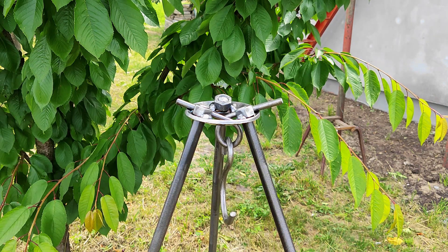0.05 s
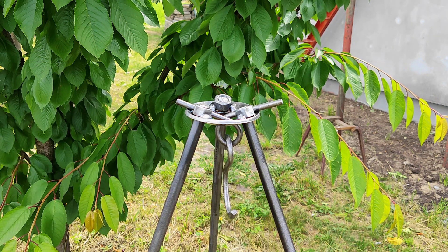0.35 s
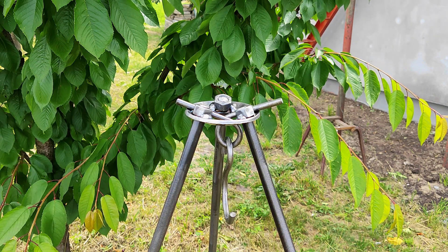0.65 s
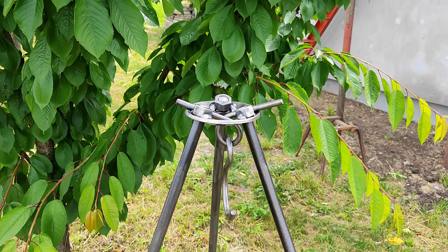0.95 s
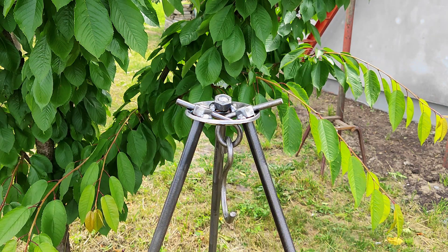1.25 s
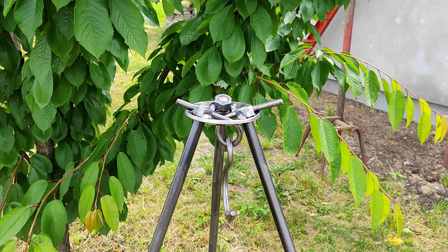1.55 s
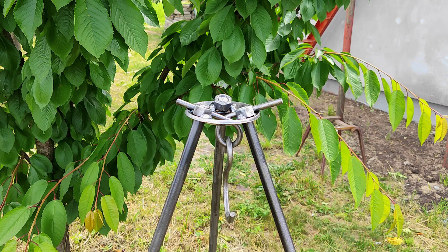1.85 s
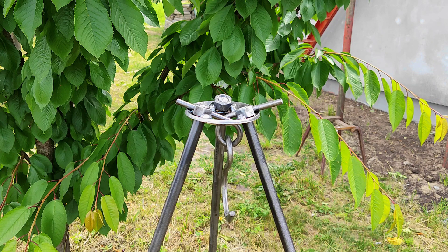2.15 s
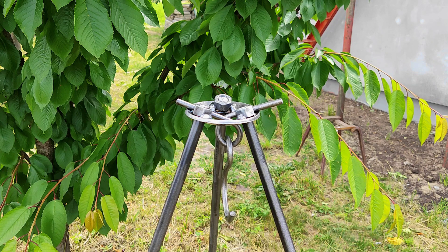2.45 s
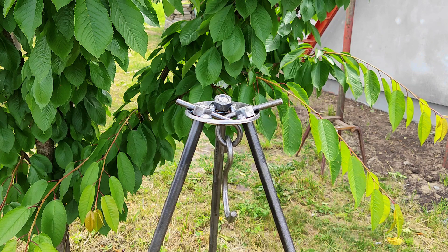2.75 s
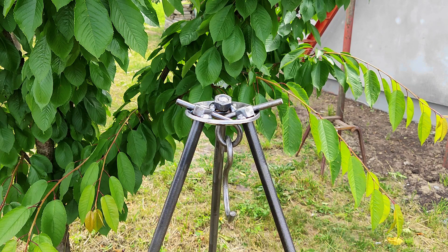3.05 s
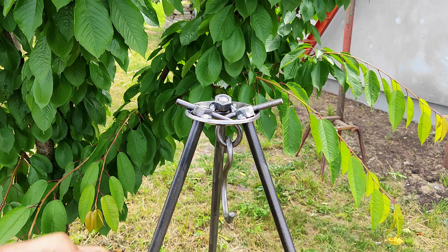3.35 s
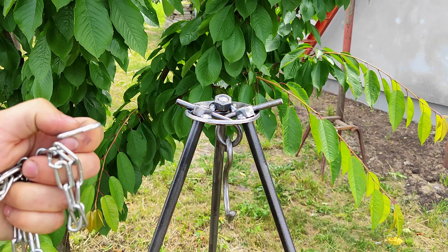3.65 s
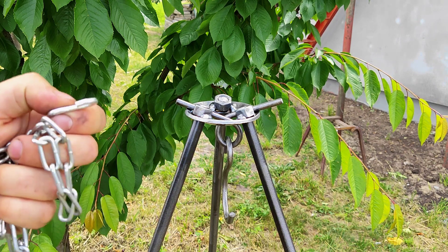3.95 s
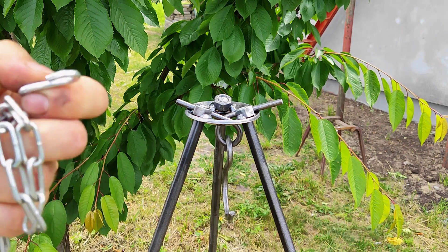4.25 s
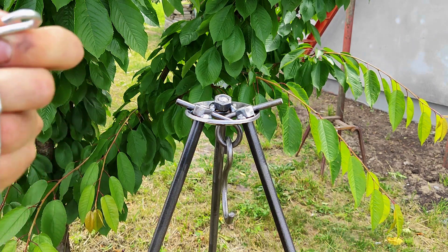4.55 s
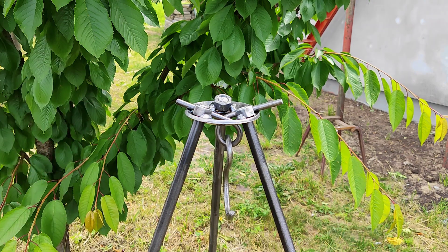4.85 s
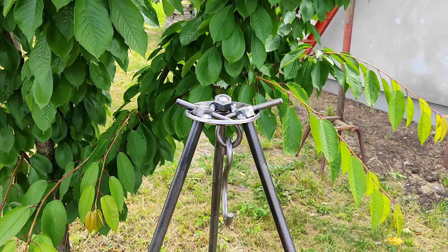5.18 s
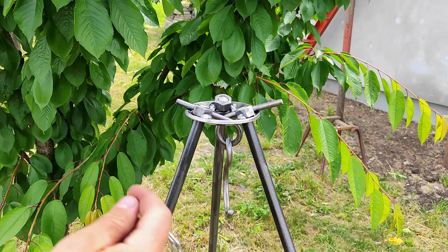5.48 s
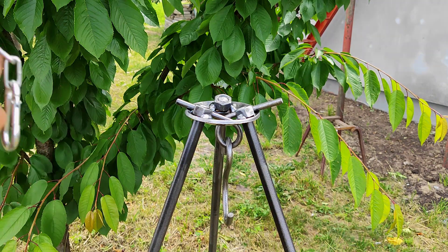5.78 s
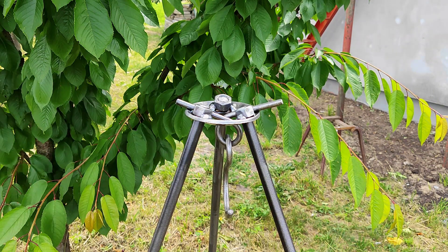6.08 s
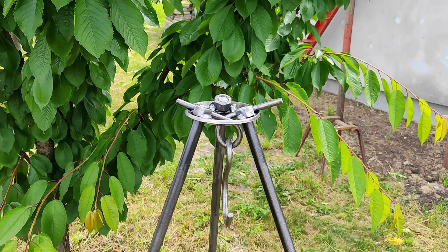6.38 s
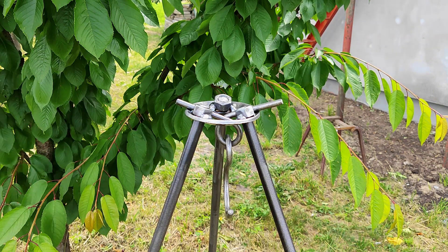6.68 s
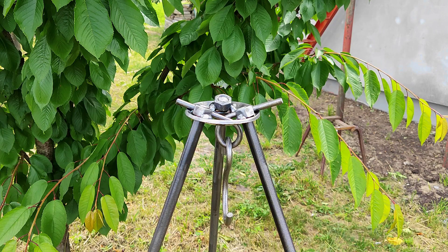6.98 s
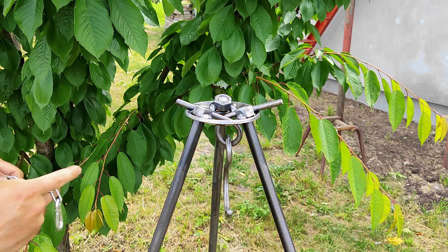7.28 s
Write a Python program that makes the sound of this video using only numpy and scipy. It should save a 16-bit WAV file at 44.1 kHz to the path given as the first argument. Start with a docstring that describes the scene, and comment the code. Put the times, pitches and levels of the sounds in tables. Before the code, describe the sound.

In a garden, small birds chirp at a distance over a low rumble and the faint hum of far engines. A sleeve rustles and ticks close to the microphone on the right, with a few soft steps in grass. About halfway through, a steel chain is gathered in a hand up close: single links ping, a bunch clashes sharply, and one smaller clink follows. The rustling and chirping carry on.

```python
"""Feet brush through garden grass and a sleeve rustles and ticks beside the right microphone,
while small birds twitter further off, over the hum of distant engines.
About halfway through, a steel chain is gathered in one hand close to the phone: single links
ping on their high modes, then a bunch of them drops and clashes until the hand damps it."""
import sys
import numpy as np
from scipy import signal
from scipy.fft import rfft, irfft, next_fast_len
from scipy.io import wavfile
from scipy.ndimage import uniform_filter1d

SR = 44100
rng = np.random.default_rng(int(sys.argv[2]) if len(sys.argv) > 2 else 0)


def log_audio(samples):
    """Write samples as a 16-bit WAV file to the path given in sys.argv[1]."""
    # one column per channel
    frames = np.atleast_2d(samples).T
    # limit to full scale, then quantise
    limited = np.clip(frames, -1, 1)
    pcm = np.round(limited * 32767).astype(np.int16)
    wavfile.write(sys.argv[1], SR, pcm)


N = 322812
TIME = np.arange(N) / SR
ONE_SECOND = TIME[:SR]

# Levels in the tables are relative: each layer applies its own gain on top.
# tone of the open air: frequency_hz, level_db
AIR_SPECTRUM = [(20, 0.5), (44, -7), (120, -13), (274, -23.5), (550, -25), (1200, -31), (2470, -37),
                (5000, -32), (8700, -52.5), (10500, -46), (15500, -59)]
# two far engines: time_s, firing_hz, level_db
HIGH_ENGINE = [(0, 119.5, -63), (2.3, 123.5, -60.5), (4.2, 126, -63), (4.9, 136.1, -61), (7.3, 143.2, -68)]
LOW_ENGINE = [(0, 80.96, -60), (1.1, 95.3, -63), (1.6, 96.1, -75), (5.9, 79.5, -79), (6.7, 85.7, -58),
              (7.3, 88.8, -71.5)]
# sparrow notes, some joined into arches: start_s, length_s, start_hz, end_hz, level_db
CHIRPS = [(0.289, .06, 5500, 5470, -58), (0.516, 0.019, 4120, 3070, -53.5), (0.917, 0.034, 4500, 4020, -57),
          (0.988, 0.045, 3600, 4170, -56), (1.141, 0.032, 4800, 2900, -51),
          (1.536, 0.052, 4150, 3890, -52.5), (2.045, 0.034, 3290, 4320, -54),
          (2.107, 0.078, 4150, 3910, -57), (2.175, 0.05, 3200, 4500, -53), (2.273, 0.04, 3100, 4220, -54.5),
          (2.999, 0.042, 3600, 3180, -56.5), (4.623, 0.048, 3300, 4750, -55),
          (5.434, 0.034, 2900, 5000, -51.5), (5.468, .032, 5150, 2980, -50.5),
          (5.544, 0.029, 3000, 4240, -54.5), (5.621, 0.022, 3100, 3990, -55),
          (5.642, .035, 3200, 2290, -62), (5.763, 0.093, 4350, 3730, -58.5), (6.42, .045, 4400, 3830, -51),
          (6.495, 0.049, 3300, 3920, -54.5), (6.864, 0.041, 3210, 4840, -54.5),
          (6.892, .035, 4720, 3110, -51.5), (7.034, 0.043, 3370, 3690, -56)]
# shoes brushing the grass: middle_s, length_s, level_db
SCUFFS = [(0.03, 0.31, -60.5), (1.628, 0.24, -59), (2.9, 0.45, -58), (6.39, 0.55, -61.5)]
# soft steps and knocks: start_s, level_db, t60_s, centre_hz
STEPS = [(1.721, -45.5, 0.14, 577), (2.872, -46.5, 0.079, 400), (4.763, -38, 0.014, 450),
         (6.44, -53.5, 0.16, 604)]
# arm strokes dragging the sleeve: start_s, length_s, level_db
ARM_STROKES = [(0.7, 0.22, -62.5), (1.227, 0.26, -55.5), (1.484, 0.3, -58.5), (1.958, 0.16, -58),
               (2.202, 0.36, -55.5), (2.611, 0.35, -56), (3.047, 0.18, -54), (3.34, 0.19, -59),
               (3.864, 0.33, -65), (4.229, 0.21, -54), (4.596, 0.18, -55), (4.83, 0.25, -54),
               (5.682, 0.05, -64.5), (6.201, 0.56, -60.5), (6.486, 0.098, -53.5), (6.914, 0.16, -56.5),
               (7.21, 0.12, -57.5)]
# low rasp of the sleeve pressed harder, relative to the rubbing: time_s, level_db
SLEEVE_RASP = [(3.3, -18), (4.2, -8), (4.75, -7), (5.1, -6), (5.6, -14)]
# cloth folds snapping: start_s, level_db
FOLD_SNAPS = [(0.456, -35), (1.112, -29), (1.2267, -32), (1.32, -42), (1.4417, -28), (1.5226, -34),
              (1.9722, -27.5), (1.9989, -35), (2.0771, -27), (2.217, -31), (2.227, -24), (2.553, -25.5),
              (3.9714, -30), (4.3162, -22), (4.6724, -28), (4.691, -25.5), (4.7638, -22), (4.991, -24.5),
              (5.0418, -26), (6.224, -31), (6.579, -33.5), (6.7388, -25), (6.8535, -29.5)]
# tone of cloth friction: frequency_hz, level_db
CLOTH_SPECTRUM = [(1200, -19), (3500, -7), (6200, -2), (7800, -2), (8700, -6), (11000, 0), (15500, 1)]
# tone of links chattering together: frequency_hz, level_db
RATTLE_SPECTRUM = [(150, -26), (320, -12.5), (850, -19), (1500, -0.5), (2300, -2.5), (4000, -1),
                   (6300, -0.5), (7300, -5), (9000, -12.5), (11500, -10), (15500, -15.5)]
# tone of the crack as a link is hit: frequency_hz, level_db
CRACK_SPECTRUM = [(1800, -23), (3500, -7.5), (6000, -2), (15000, -7.5)]
# modes of the bunch, the dangling end and two free links: pitch_hz, level_db
BUNCH = [(330, -8), (500, -8), (1270, -7), (1540, -2), (1838, -1), (2078, 0), (2180, 4), (2261, -3),
         (2401, -4), (2697, -3), (3195, -2), (3860, 0), (4280, -7), (4638, 1), (5142, -3), (5240, -2),
         (6193, -1), (6287, 0), (6409, -1), (11343, -5)]
LOOSE_END = [(1303, 2), (1650, 5), (1825, 6), (3208, 3), (3601, 7), (3880, 5), (6520, 3)]
SCRAPED_LINK = [(2810, -9), (5249, -4), (6196, -2), (7176, 0), (8323, -3), (9518, -5)]
TAPPED_LINK = [(3520, -8), (4340, -4), (5140, -3), (5394, -6), (6042, 1), (10380, -3), (11580, -2),
               (13150, -2), (14470, -4)]
# a free link tapped or scraped: start_s, level_db, contact_s, modes
LINK_TAPS = [(3.4381, -34.5, 0.013, SCRAPED_LINK), (3.458, -34.5, 0.0066, SCRAPED_LINK),
             (3.5859, -25.5, 0.0023, TAPPED_LINK)]
# a link swinging clear to sing on one mode: start_s, pitch_hz, level_db, t60_s
SINGING_LINKS = [(3.586, 6318, -35, .1), (3.586, 7273, -39, .14), (3.669, 4640, -29, .14),
                 (3.70, 4735, -50, .3), (4.0925, 4648, -34.5, 0.08), (6.282, 12760, -41, 0.057)]
# links falling on each other: start_s, level_db, t60_s, bass_db, modes
CHAIN_BLOWS = [(3.634, -22, 0.045, -8.5, BUNCH), (3.6377, -16, 0.061, 1, BUNCH),
               (3.6447, -19.5, 0.0525, 3, BUNCH), (3.652, -17, 0.16, -3.5, BUNCH),
               (3.7018, -24.5, 0.096, -8, BUNCH), (3.712, -36, 0.21, -7, BUNCH),
               (4.0698, -25.5, 0.08, -2.5, LOOSE_END)]


def undb(db):
    """Decibels to gain."""
    return 10 ** (np.asarray(db) / 20)


def unit(x):
    """Scale to rms 1."""
    return x / np.sqrt(np.mean(x ** 2))


def curves(rows):
    """Each column after the first as an automation curve through time."""
    times, *columns = np.transpose(rows)
    return [np.interp(TIME, times, column) for column in columns]


def colour(x, points):
    """EQ a sound through (frequency_hz, level_db) points, at rms 1."""
    size = next_fast_len(x.shape[-1])
    hz, db = np.transpose(points)
    bins = np.maximum(np.fft.rfftfreq(size, 1 / SR), 1)
    gain = undb(np.interp(np.log(bins), np.log(hz), db))
    return unit(irfft(rfft(x, size) * gain, size)[..., :x.shape[-1]])


def band(x, hz, width_hz):
    """One resonance with steep skirts, at rms 1."""
    b, a = signal.iirpeak(hz, hz / width_hz, fs=SR)
    return unit(signal.lfilter(b, a, signal.lfilter(b, a, x)))


def stereo_noise(size, wide_hz):
    """Noise at two microphones: narrow in the bass, wide above wide_hz."""
    mid, side = rng.standard_normal((2, size))
    side = signal.lfilter(*signal.butter(1, wide_hz, "high", fs=SR), side)
    side += 0.5 * rng.standard_normal(size)
    return unit(np.array([mid + side, mid - side]))


def pan(db):
    """Left and right gains for a left-minus-right level."""
    return unit(undb(np.array([[db], [-db]]) / 2))


def drift(rate_hz):
    """Smooth random modulation with a spread near 1."""
    hold = int(SR / rate_hz)
    stairs = np.repeat(rng.standard_normal(N // hold + 1), hold)[:N]
    return 1.515 * uniform_filter1d(uniform_filter1d(stairs, hold), hold)


def bursts(per_s, spread_db, t60):
    """Grainy envelope: random bursts of uneven size start at once and die away; rms 1."""
    chance, size = rng.random(N), np.minimum(rng.exponential(size=N), 4)
    energy = (chance < per_s / SR) * undb(spread_db * size) ** 2
    decay = np.exp(-2 * np.log(1000) / (t60 * SR))
    return unit(np.sqrt(signal.lfilter([1], [1, -decay], energy + 1e-9)))


def fade(t60):
    """Exponential decay, 60 dB down after t60 seconds."""
    return np.exp(-np.log(1000) * ONE_SECOND / t60)


def add(out, start_s, sound):
    """Mix a sound in at a time."""
    i = int(start_s * SR)
    out[:, i:i + sound.shape[-1]] += sound[..., :N - i]


def garden(x, wet_db, t60):
    """Leaves and a wall scatter a thin tail behind the sound."""
    tail = rng.standard_normal((2, SR)) * fade(t60) * (1 - fade(0.0052))
    tail /= np.sqrt(np.sum(tail ** 2) / 2)
    return x + undb(wet_db) * signal.fftconvolve(x, tail, axes=-1)[:, :N]


def open_air(air_db=-51.5, breeze_db=-63, whine_db=-74):
    """The bed: low rumble and faint hiss, a breeze on each microphone and a thin steady whine."""
    air = undb(air_db + 0.13 * drift(2.91)) * colour(stereo_noise(N, 500), AIR_SPECTRUM)
    breeze = undb(breeze_db + 2 * drift(3.1)) * band(rng.standard_normal((2, N)), hz=44, width_hz=70)
    whine = undb(whine_db) * band(stereo_noise(N, 680), hz=505.7, width_hz=5.8)
    return air + breeze + whine


def engine(rows, harmonics_db, waver=0.0068, throb_db=2.0):
    """A far engine: low harmonics of its firing rate waver on their way through the air."""
    firing_hz, db = curves(rows)
    phase = 2 * np.pi * np.cumsum(firing_hz * (1 + waver * drift(6.1))) / SR
    return sum(np.sqrt(2) * undb(db + harmonic_db + throb_db * drift(7.8)) * np.sin(k * phase)
               for k, harmonic_db in enumerate(harmonics_db, 1))


def flock(db=-73):
    """Birds far off blur into a twitter that flickers from pitch to pitch."""
    noise = stereo_noise(N, 5100)
    voices = [bursts(per_s=14, spread_db=3, t60=.2) * band(noise, hz, width_hz=900)
              for hz in (3400, 4300, 5400)]
    return undb(db) * sum(voices) / 2


def far_call(start_s=2.3, length_s=.38, glide_hz=(1305, 1175), db=-68, quaver=0.0069):
    """A distant bird's long call swells, falls gently with a slight quaver and fades."""
    out = np.zeros((2, N))
    progress = np.linspace(0, 1, int(length_s * SR))
    hz = np.linspace(*glide_hz, len(progress)) * (1 + quaver * drift(61.4)[:len(progress)])
    add(out, start_s, undb(db) * np.sin(np.pi * progress) * np.sin(2 * np.pi * np.cumsum(hz) / SR))
    return out


def sparrows(trim_db=-2, bow_hz=295, husk=.045):
    """Each note is a husky whistle that flicks up or down along a bowed, slightly jagged line."""
    out = np.zeros((2, N))
    for start_s, length_s, start_hz, end_hz, db in CHIRPS:
        progress = np.linspace(0, 1, int(length_s * SR))
        flutter = unit(uniform_filter1d(rng.standard_normal(SR), size=50))[:len(progress)]
        sweep_hz = start_hz + (end_hz - start_hz) * progress + bow_hz * np.sin(np.pi * progress)
        whistle = np.sin(2 * np.pi * np.cumsum(sweep_hz * (1 + husk * flutter)) / SR)
        add(out, start_s, undb(db + trim_db) * signal.windows.tukey(len(whistle), .5) * whistle)
    return out


def grass_scuffs():
    """Grass blades slip under a shoe in soft swells."""
    swell = sum(undb(db) * np.cos(np.pi * np.clip((TIME - middle_s) / length_s, -.5, .5)) ** 2
                for middle_s, length_s, db in SCUFFS)
    blades = stereo_noise(N, 1500) * bursts(per_s=140, spread_db=2.5, t60=0.13)
    return swell * band(blades, hz=1130, width_hz=1800)


def steps():
    """Feet land in dull, brief thuds."""
    out = np.zeros((2, N))
    for start_s, db, t60, hz in STEPS:
        thud = band(stereo_noise(SR, 2000), hz, width_hz=0.94 * hz)
        add(out, start_s, undb(db) * thud * (fade(t60) - fade(t60 / 10)))
    return out


def sleeve_speed(attack_s=0.0043, release_s=0.046, swell_db=1.5, creep_db=-73, flutter_db=3.5):
    """Each arm stroke starts quickly, gathers pace unevenly and dies away to a slow creep."""
    speed = np.full(N, undb(creep_db))
    for start_s, length_s, db in ARM_STROKES:
        age_s = TIME - start_s
        attack = np.clip(age_s / attack_s, 0, 1)
        ramp_db = swell_db * (np.clip(age_s / length_s, 0, 1) - 1)
        release = np.exp(-np.maximum(age_s - length_s, 0) / release_s)
        speed = np.maximum(speed, undb(db + ramp_db) * attack * release)
    return speed * undb(flutter_db * drift(24.875))


def sleeve(rub_db=8.0, snap_db=-8.5, snap_t60=0.027):
    """Cloth catches and slips in crunches of tiny fibre clicks, and folds snap; the hiss sits right."""
    crunches = bursts(per_s=300, spread_db=2, t60=.06)
    fibre_clicks = bursts(per_s=3600, spread_db=3, t60=.003)
    friction = unit(stereo_noise(N, 1700) * crunches * fibre_clicks)
    speed = sleeve_speed()
    rub = undb(rub_db) * speed * colour(friction, CLOTH_SPECTRUM)
    rasp = undb(curves(SLEEVE_RASP)[0]) * speed * band(friction, hz=2630, width_hz=1500)
    snap_envelope = np.zeros((2, N))
    for start_s, db in FOLD_SNAPS:
        add(snap_envelope, start_s, undb(db + snap_db) * fade(snap_t60))
    snaps = snap_envelope * colour(stereo_noise(N, 3000), CLOTH_SPECTRUM)
    return pan(-6.0) * (rub + snaps) + rasp


def steel_ring(modes, t60, scatter_db=2.5, detune_hz=9, spread_rad=0.93):
    """Steel modes: every contact point weights them anew and each microphone hears another phase."""
    out = 0
    for hz, db in modes:
        turn, side, weight, detune = rng.standard_normal(4)
        phase = 2 * np.pi * turn + spread_rad * side * np.array([[1], [-1]])
        tone = np.sin(2 * np.pi * (hz + detune_hz * detune) * ONE_SECOND + phase)
        out = out + undb(db + scatter_db * weight) * tone
    return out * fade(t60)


def link_pings(crack_db=-1.5, ring_db=-9, t60=.06):
    """A free link cracks and rings, longer when scraped; links swinging clear sing one pure tone."""
    out = np.zeros((2, N))
    for start_s, db, contact_s, modes in LINK_TAPS:
        crack = colour(stereo_noise(SR, 2590), CRACK_SPECTRUM) * fade(t60 + 4 * contact_s)
        ring = steel_ring(modes, t60 + 10 * contact_s)
        attack = 1 - np.exp(-4 * ONE_SECOND / contact_s)
        add(out, start_s, undb(db) * (undb(ring_db) * ring + undb(crack_db) * crack) * attack)
    for start_s, hz, db, sing_t60 in SINGING_LINKS:
        tone = np.sqrt(2) * np.sin(2 * np.pi * hz * ONE_SECOND)
        add(out, start_s, undb(db) * tone * (fade(sing_t60) - fade(0.0054)))
    return out


def chain_clashes(rattle_db=-2, ring_db=-11.5, damping=0.75):
    """Each blow sets the links chattering, and their strongest modes ring until the hand damps them."""
    out = np.zeros((2, N))
    for start_s, db, t60, bass_db, modes in CHAIN_BLOWS:
        shelf = [(2200, bass_db), (3500, 0)]  # light contacts leave the low modes quiet
        chatter = bursts(per_s=1500, spread_db=1.7, t60=.009)[-SR:]
        noise = colour(stereo_noise(SR, 2500), RATTLE_SPECTRUM)
        rattle = unit(colour(noise, shelf) * chatter) * fade(t60)
        shelved_modes = [(hz, mode_db + np.interp(hz, *np.transpose(shelf))) for hz, mode_db in modes]
        ring = steel_ring(shelved_modes, damping * t60)
        add(out, start_s, undb(db) * (undb(rattle_db) * rattle + undb(ring_db) * ring))
    return out


def scene():
    """The chain is close and nearly dry, its treble beamed right; the birds are far and diffuse."""
    chain = chain_clashes() + link_pings()
    treble = signal.sosfiltfilt(signal.butter(2, 6800, "high", fs=SR, output="sos"), chain)
    chain = pan(-0.41) * garden(chain - treble, wet_db=-20, t60=0.36) + pan(-3.5) * treble
    foley = sleeve() + steps() + grass_scuffs()
    birds = garden(sparrows() + far_call(), wet_db=1.5, t60=0.49) + flock()
    air = open_air()
    engines = engine(HIGH_ENGINE, harmonics_db=[0, -19]) + engine(LOW_ENGINE, harmonics_db=[-1, -7])
    return air + engines + birds + foley + chain


def record(dry, top_hz=15950):
    """The phone cuts the top with a steep low-pass."""
    return signal.sosfilt(signal.ellip(10, .2, 70, top_hz, fs=SR, output="sos"), dry)


dry = scene()
out = record(dry)
log_audio(out)
```